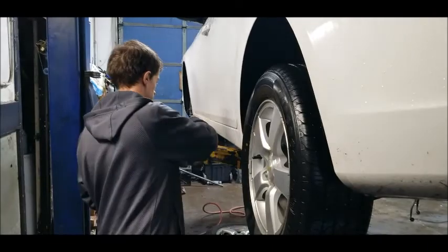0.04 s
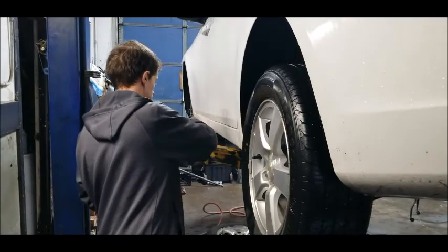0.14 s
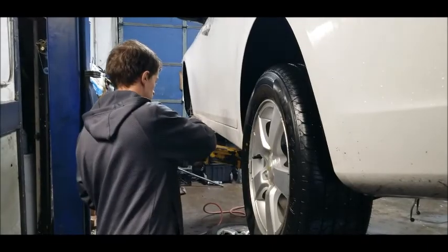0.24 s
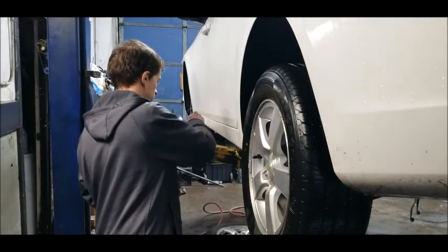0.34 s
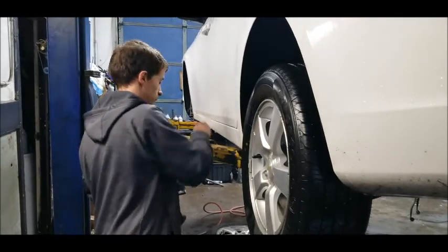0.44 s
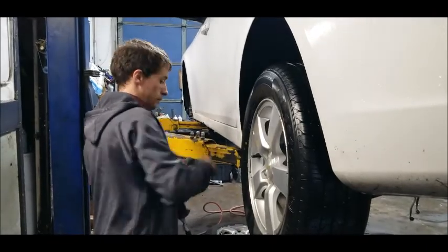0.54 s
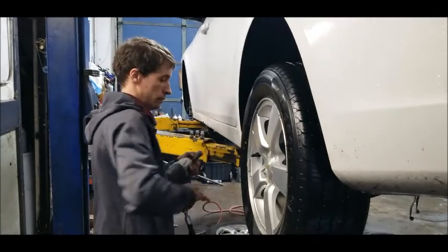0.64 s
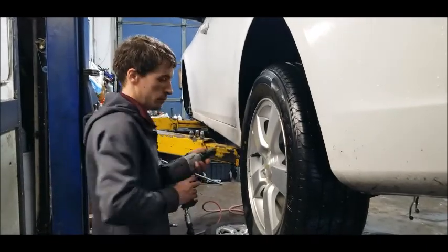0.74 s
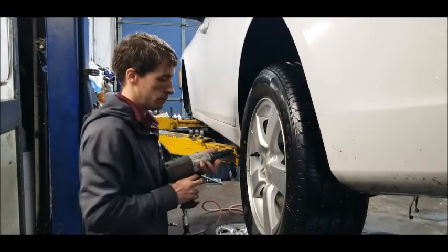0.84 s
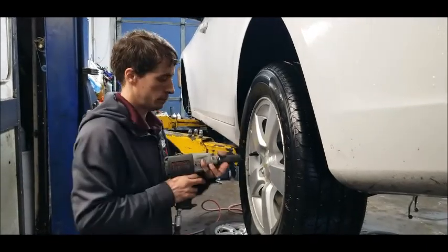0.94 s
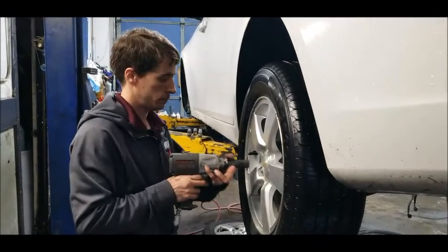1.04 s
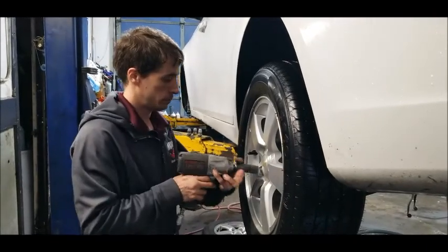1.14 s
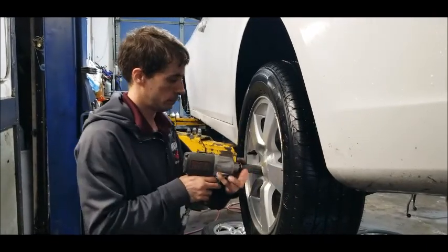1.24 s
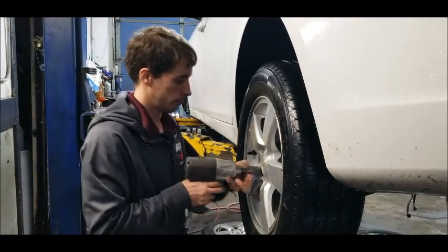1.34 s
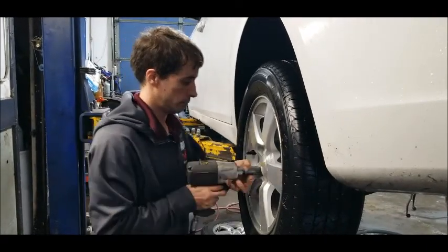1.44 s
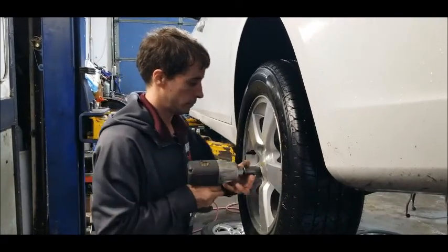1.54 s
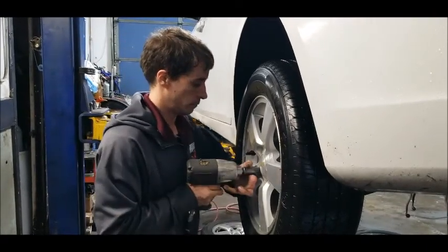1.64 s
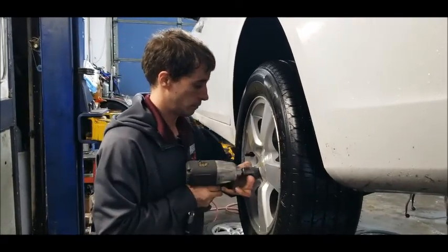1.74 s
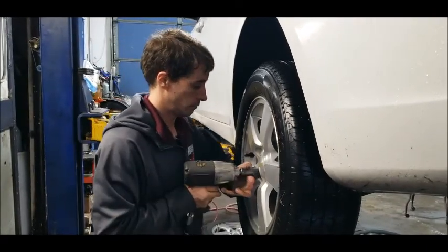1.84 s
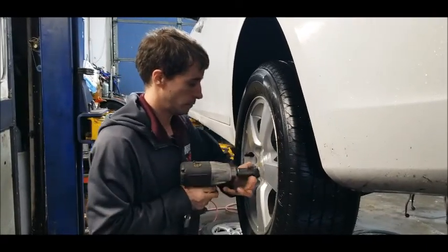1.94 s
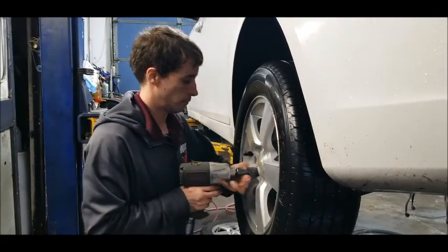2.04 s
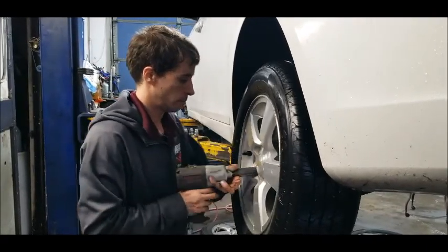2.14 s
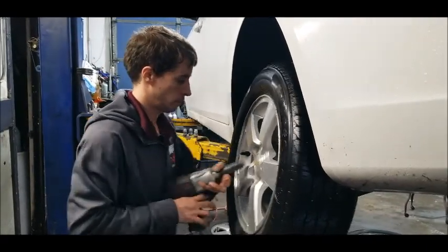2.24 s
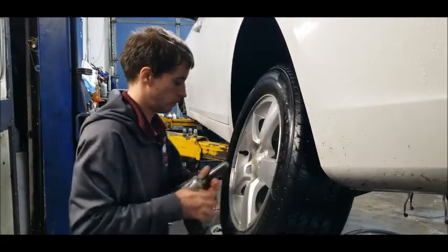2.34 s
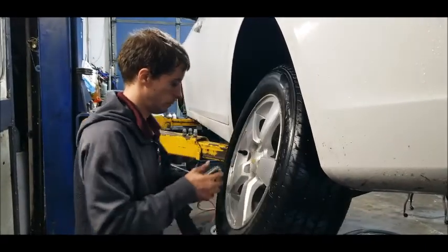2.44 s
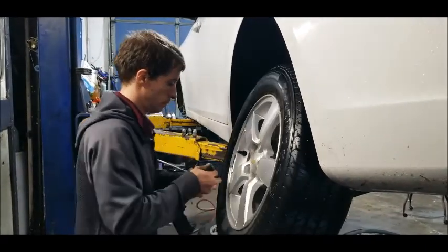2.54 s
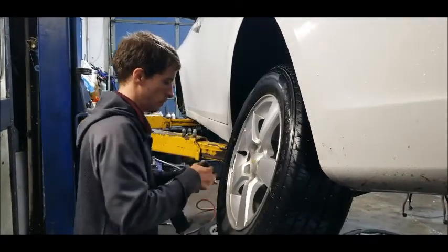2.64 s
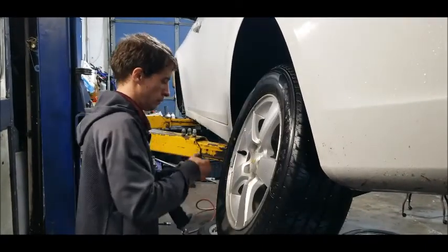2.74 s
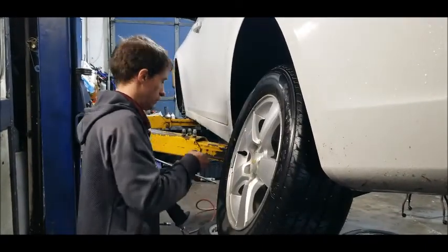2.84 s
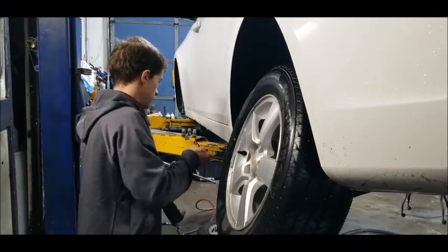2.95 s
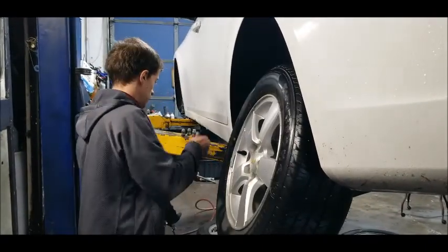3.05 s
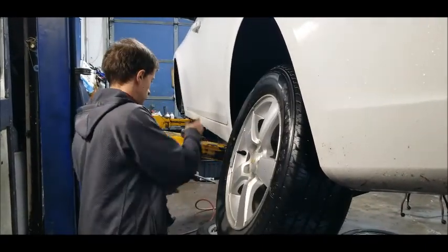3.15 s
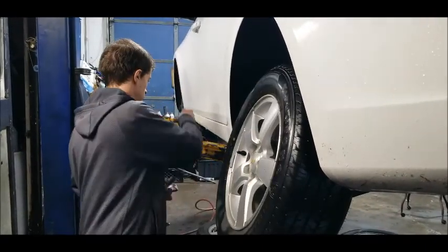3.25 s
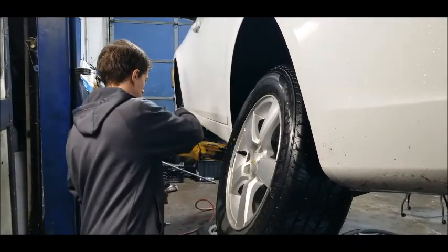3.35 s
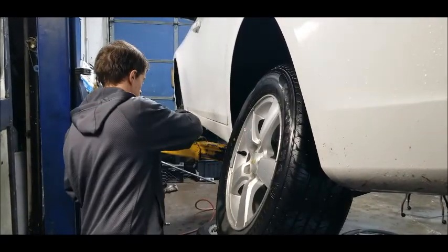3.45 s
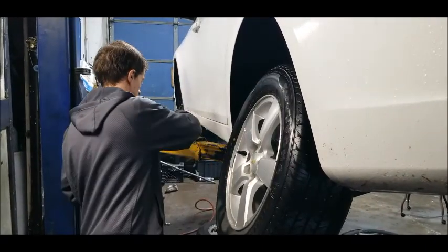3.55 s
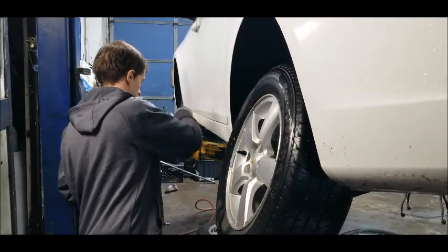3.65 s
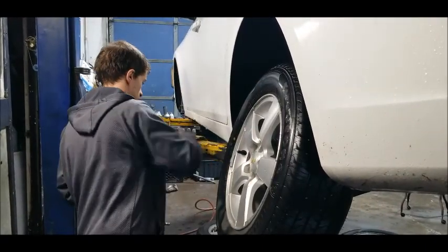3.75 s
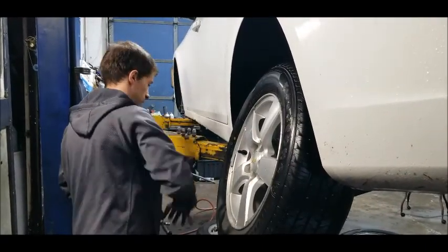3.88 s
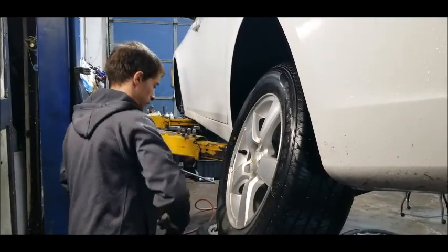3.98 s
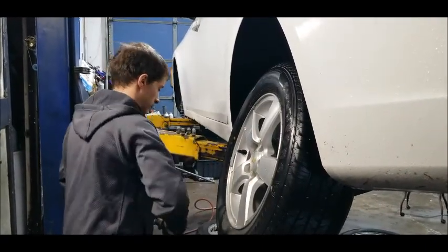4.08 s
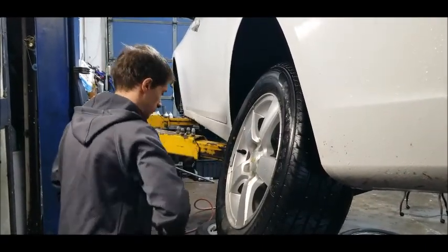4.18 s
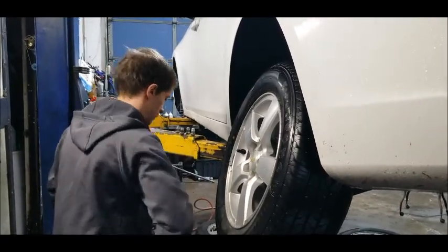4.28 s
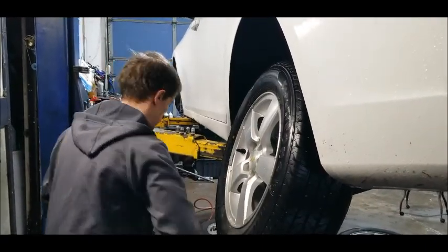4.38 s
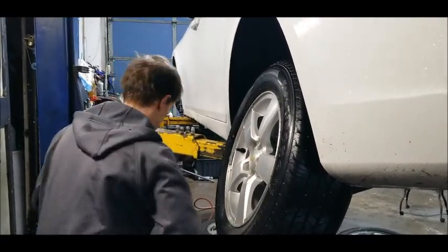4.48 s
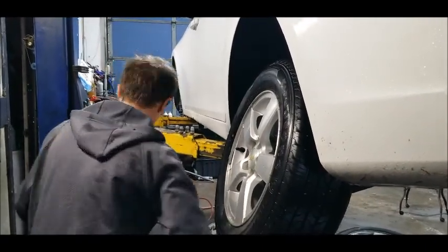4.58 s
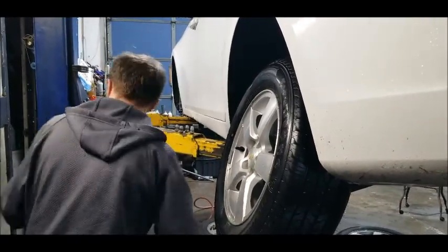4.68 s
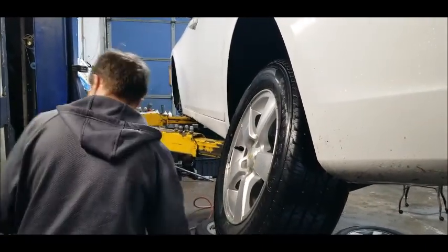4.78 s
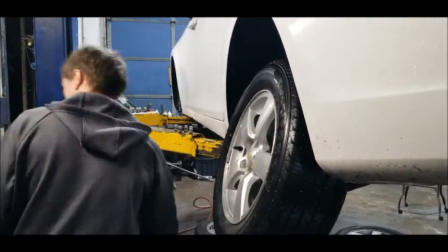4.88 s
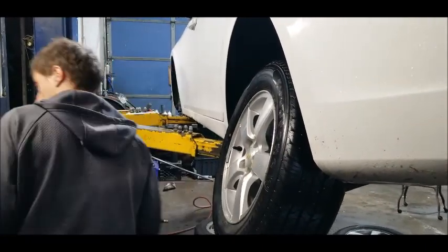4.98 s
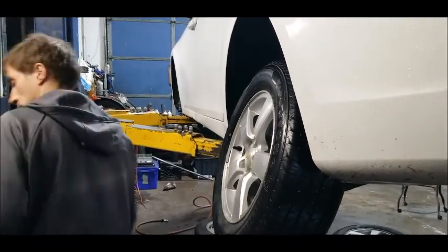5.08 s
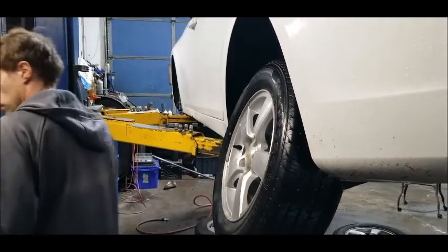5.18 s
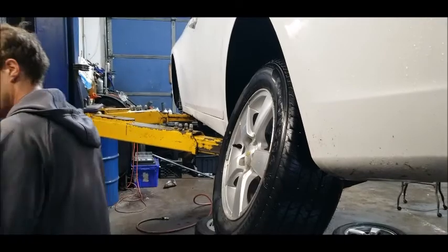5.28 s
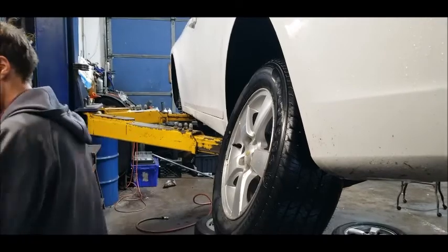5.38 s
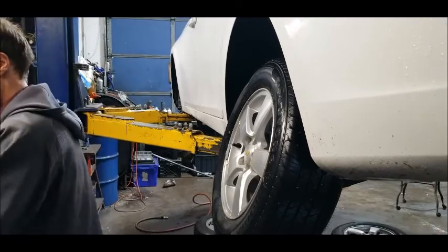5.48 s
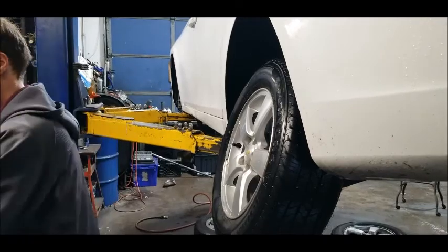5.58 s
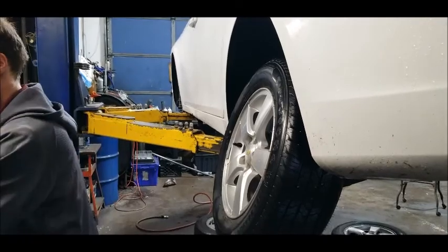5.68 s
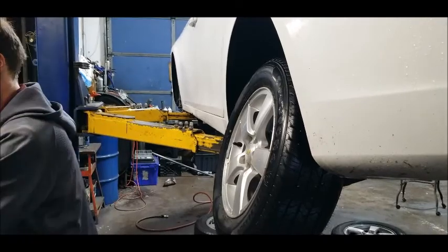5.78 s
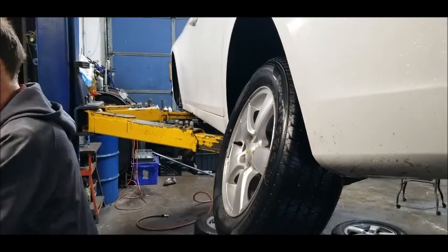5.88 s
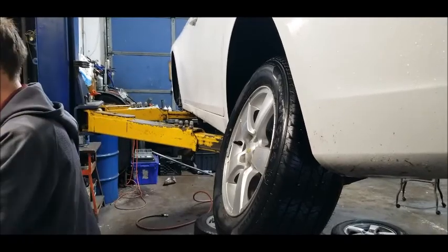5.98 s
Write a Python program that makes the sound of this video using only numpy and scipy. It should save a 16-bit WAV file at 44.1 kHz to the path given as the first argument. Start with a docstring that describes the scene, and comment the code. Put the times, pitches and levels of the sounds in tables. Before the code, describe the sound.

In a humming garage, an air wrench hammers a wheel nut in one short burst, whines down, then air vents and a hollow object lands.

```python
"""An air wrench in a garage workshop hammers on a wheel nut, spins free and winds down with a whine.
Hammer blows excite resonances; vanes chop the exhaust hiss, drive the whine and ring the exhaust port.
Around it, struck bodies (socket, nut, steel, tools) ring in decaying modes, clothes rustle as shaped noise,
the air coupling vents twice as rushing noise, and something heavy and hollow is put down.
A fan hums behind as narrow noise bands and motor tones, and a dying noise tail gives the hall."""
import sys
import numpy as np
from scipy import signal
from scipy.fft import rfft, irfft
from scipy.io import wavfile

SR = 44100
rng = np.random.default_rng(int(sys.argv[2]) if len(sys.argv) > 2 else 0)


def to_wav(sig):
    """Store sig (one row per channel, or 1-D mono) as 16-bit WAV at the path in sys.argv[1].

    Samples outside -1..1 are clipped; the rate is SR.
    """
    pcm = np.clip(np.atleast_2d(sig), -1, 1) * 32767
    pcm = np.round(pcm).astype(np.int16)
    wavfile.write(sys.argv[1], SR, pcm.T)  # frames by channels


N = 265469
TIME = np.arange(N) / SR

# Spectrum of escaping air, for blows and exhaust. Each row: frequency in Hz, relative level in dB.
HISS_SPECTRUM = [(180, -44.5), (300, -13), (539, -14), (660, -11), (1090, -5), (1250, -18.5), (1580, -7),
                 (3770, -7), (5830, -1.5), (8580, -21), (11800, -3.5), (15700, -10), (16500, -31)]
# Spectrum of bright rubbing, also of the faint hiss. Each row: frequency in Hz, relative level in dB.
BRIGHT_RUB_SPECTRUM = [(3000, -23.5), (4500, -5.5), (6160, 0.5), (8860, -19.5), (12700, -3), (15900, -20),
                       (16500, -43.5)]


def from_db(db):
    """Amplitude ratio of a level: 20 dB is a factor of ten."""
    return 10 ** (np.asarray(db) / 20)


def rms_one(x):
    """Normalization to unit root-mean-square amplitude."""
    return x / np.sqrt(np.mean(x ** 2) + 1e-20)


def in_time(rows):
    """Linear interpolation of a curve's columns at every sample."""
    s, *columns = np.transpose(rows)
    return [np.interp(TIME, s, column) for column in columns]


def placed(x, pan_db):
    """Stereo placement by level difference, left over right, shared between both channels."""
    gains = from_db(np.array([pan_db / 2, -pan_db / 2]))
    return x * gains.reshape(2, -1)


def noise(spectrum):
    """Filtered stereo noise of rms 1; the coherence of the channels depends on frequency."""
    # Likeness of left and right. Each row: frequency in Hz, correlation from 0 to 1.
    likeness = [(30, .9), (150, 0.88), (300, .85), (550, 0.27), (1200, 0.09), (3000, 0.08), (15000, .03)]
    log_hz = np.log(np.fft.rfftfreq(N, 1 / SR) + 1)

    def read(table):
        hz, value = np.transpose(table)
        return np.interp(log_hz, np.log(hz), value)

    alike = np.clip(read(likeness), 0, 1)
    mid, side = rfft(rng.standard_normal((2, N)))
    both = np.sqrt(1 + alike) * mid + np.sqrt(1 - alike) * side * [[1], [-1]]
    return rms_one(irfft(both * from_db(read(spectrum)), N))


def resonance(x, hz, width_hz):
    """Two-pole resonance with about unit gain at its peak; the pole radius sets the bandwidth."""
    r = np.exp(-np.pi * width_hz / SR)
    poles = [1, -2 * r * np.cos(2 * np.pi * hz / SR), r * r]
    return signal.lfilter([(1 - r * r) / 2, 0, (r * r - 1) / 2], poles, x)


def drift(rate_hz):
    """Random fluctuation of rms 1: noise low-passed at the given rate."""
    low_pass = signal.butter(2, rate_hz, fs=SR, output="sos")
    slow = signal.sosfilt(low_pass, rng.standard_normal(N + SR))
    return rms_one(slow[SR:])   # the filter has settled


def dying(start_s, t60_s, rise_s):
    """Exponential decay, falling 60 dB in t60_s, after an exponential rise."""
    t = np.maximum(TIME - start_s, 0)
    return (1 - np.exp(-t / rise_s)) * from_db(-60 * t / max(t60_s, .005))


def struck(hits, modes):
    """Modal synthesis: every impulse excites the same damped sinusoids."""
    clicks = np.full(N, 1e-18)
    for s, db in hits:
        clicks[round(s * SR)] = from_db(db)
    out = 0
    for hz, level_db, t60_s in modes:
        r = from_db(-60 / (t60_s * SR))
        w = 2 * np.pi * hz / SR
        poles = [1, -2 * r * np.cos(w), r * r]
        out = out + signal.lfilter([0, from_db(level_db) * np.sin(w)], poles, clicks)
    return out


def cracks(hits):
    """Impulse response of broad resonances, with random strengths: cracks of about a millisecond."""
    # Crack resonances. Each row: frequency in Hz, bandwidth in Hz, relative level in dB.
    crack_modes = [(2200, 1500, -9), (4200, 640, -1.5), (6400, 330, 6), (11420, 600, -3.5),
                   (15100, 5700, -9.5)]
    at = np.round(hits[:, 0] * SR).astype(int)
    spread_db = 2.2 * rng.standard_normal((len(hits), len(crack_modes)))
    out = 0
    for k, (hz, width_hz, db) in enumerate(crack_modes):
        clicks = np.full(N, 1e-18)
        clicks[at] = from_db(hits[:, 1] + db + 9.5 + spread_db[:, k])
        out = out + (-1) ** k * resonance(clicks, hz, width_hz)   # alternate polarity
    return out


def workshop_air():
    """Superposition of slowly wavering motor tones, narrow-band fan noise and broad noise of the hall."""
    # Wavering fan hum. Each row: frequency in Hz, bandwidth in Hz, relative level in dB.
    fan_bands = [(78, 52, -68), (213.1, 10, -60.5), (238.36, 8.8, -53), (299.4, 5.4, -53)]
    # Background level over time. Each row: time in seconds, gain of the fan bands in dB, broad noise in dB.
    background_level = [(0, -2.5, -51), (.5, 1.5, -48.5), (1.6, 0, -47.5), (2.2, 0.5, -51.5),
                        (2.8, -6, -53), (3.5, 1, -49.5), (4, 0.5, -49), (4.5, 6, -44.5), (5.3, 3, -43.5),
                        (6.02, 3.5, -46.5)]
    # Motor hum. Each row: frequency in Hz, relative level in dB.
    motor_tones = [(75.4, -59), (120, -66.5), (152, -54), (259, -53)]
    # Broad noise spectrum. Each row: frequency in Hz, relative level in dB.
    air_spectrum = [(15, -42), (25, -13.5), (108, -7.5), (146, -16), (192, -11.5), (252, 1), (358, -15.5),
                    (524, -13), (1250, -22.5), (2330, -23.5), (6040, -39), (8370, -57), (12900, -52),
                    (15200, -53.5), (16500, -68)]
    bands_db, broad_db = in_time(background_level)
    bands = 0
    for hz, width_hz, db in fan_bands:
        white = rng.standard_normal(N + SR)
        band = resonance(resonance(white, hz, width_hz), hz, width_hz)
        bands = bands + from_db(db) * rms_one(band[SR:])
    motor = 0
    for hz, db in motor_tones:
        level = from_db(db + 1.0 + 1.7 * drift(0.5))
        cycles = hz * TIME + rng.random() + 0.1 * drift(2.1)
        motor = motor + level * np.sin(2 * np.pi * cycles)
    hum = from_db(bands_db) * bands + motor
    return placed(hum, -3.0) + placed(from_db(broad_db) * noise(air_spectrum), -1.1)


def far_clack():
    """Two-stage decay: a clack across the shop, dulled by distance, starts quickly and trails off."""
    # Spectrum of the clack. Each row: frequency in Hz, relative level in dB.
    clack_spectrum = [(700, -25), (1500, -1), (2500, -1.5), (4300, -3.5), (6800, -7), (8200, -25)]
    start_s, level_db, t60_s = 0.1406, -48.5, 0.69
    tail = dying(start_s, 0.17 * t60_s, .002) + 0.77 * dying(start_s, t60_s, .004)
    return placed(from_db(level_db) * tail * noise(clack_spectrum), 0.5)


def hall(x):
    """Convolution reverberation: dense dying reflections, the treble dulled by the walls."""
    t60_s, wall_cut_hz = 0.38, 4200
    t = TIME[:SR]
    reflections = noise([(50, -15), (200, -3), (1500, 0), (wall_cut_hz, 0), (16000, -6)])[:, :SR]
    tail = reflections * from_db(-60 * t / t60_s) * (t > .006)
    return signal.fftconvolve(x, rms_one(tail) / np.sqrt(SR), axes=1)[:, :N]


def rustle():
    """Friction noise: sleeves, hose and tool rub under smooth humps, over a faint continuous hiss."""
    # Rubbing. Each row: start in seconds, length in seconds, dull part in dB, bright part in dB.
    scuffs = [(1.197, 0.036, -51, -57), (2.405, 0.043, -46.5, -39.5), (2.48, 0.13, -55, -51.5),
              (3.492, 0.13, -56, -75), (4.175, 0.15, -56.5, -58.5), (4.385, 0.088, -68, -58.5),
              (4.826, 0.063, -49, -52.5), (4.967, .088, -53, -49), (5.077, 0.11, -49, -62),
              (5.121, 0.23, -47, -39.5), (5.828, 0.12, -69, -54)]
    # Faint hiss, perhaps an air leak. Each row: time in seconds, level in dB.
    leak_level = [(0, -70.5), (1.5, -66), (2.3, -63), (2.7, -71), (4.1, -69), (4.8, -59.5), (5.5, -58.5),
                  (5.8, -66.5), (6.02, -54.5)]
    # Spectrum of dull rubbing. Each row: frequency in Hz, relative level in dB.
    dull_spectrum = [(800, -22.5), (1500, -1.5), (2200, 0.5), (3500, -2), (5000, -25)]
    dull = noise(dull_spectrum) * from_db(0.83 * drift(100))   # drift makes the grain
    bright = noise(BRIGHT_RUB_SPECTRUM) * from_db(2.0 * drift(170))
    rubs = 0
    for s, length_s, dull_db, bright_db in scuffs:
        hump = np.sin(np.pi * np.clip((TIME - s) / length_s, 0, 1) ** .7)
        rubs = rubs + (dull * from_db(dull_db) + bright * from_db(bright_db)) * hump
    leak = from_db(in_time(leak_level)[0]) * noise(BRIGHT_RUB_SPECTRUM)
    return placed(rubs, 3.5) + placed(leak, 2.5)


def set_down():
    """Cavity-like low modes: a hollow thing lands and rocks."""
    # Landings. Each row: time in seconds, strength in dB.
    landings = [(5.813, -23.5), (5.838, -23.5), (5.895, -36), (5.937, -35.5)]
    # Modes of the hollow thing. Each row: frequency in Hz, relative level in dB, 60 dB decay in seconds.
    hollow_modes = [(345, 0, 0.1), (719, -10.5, 0.18), (777, -10, 0.13)]
    return struck(landings, hollow_modes)


def coupling():
    """Turbulent jet: the seal snaps open and trapped air rushes out, whistling in the fitting."""
    # Ventings. Each row: start in seconds, rush in dB, rise in seconds, decay scale in seconds,
    # whistle share, seal's snap in seconds, snap strength in dB.
    vents = [(4.4765, -16, .0035, .29, .22, 4.480, -12), (5.129, -20.5, .0015, .38, 1.3, 5.1303, -2)]
    # Spectrum of the rush. Each row: frequency in Hz, relative level in dB.
    vent_spectrum = [(290, -15), (500, -20), (810, -14), (1170, -13.5), (1950, -11), (2040, -10.5),
                     (2610, -13), (3500, -12.5), (5930, -2.5), (9190, -11), (12700, 5), (15800, -4.5),
                     (16500, -29)]
    air = noise(vent_spectrum) * from_db(2.36 * drift(77))
    whistle = resonance(air, 12340, 310) + 0.71 * resonance(air, 6300, 380)
    # a tone flutters during the second rush
    flutter_s, flutter_db, flutter_hz = 5.17, -32.5, 2080
    flutter = rms_one(resonance(air, flutter_hz, 250)) * from_db(flutter_db + 4.0 * drift(60))
    out = flutter * dying(flutter_s, 0.13, 0.012)
    for s, db, rise_s, decay_s, share, _, _ in vents:
        # fast at first, then slower
        pressure = dying(s, 0.21 * decay_s, rise_s) + 0.56 * dying(s, 1.35 * decay_s, rise_s)
        out = out + from_db(db) * (air + share * whistle) * pressure
    snaps = cracks(np.array(vents)[:, -2:])
    return placed(snaps + out, 9.5)


def nut_on_steel():
    """Modal ringing of the steel lift arm as the nut is laid on it."""
    # Nut laid on the lift arm. Each row: time in seconds, relative strength in dB.
    nut_hits = [(3.5004, -38)]
    # Modes of the arm. Each row: frequency in Hz, relative level in dB, 60 dB decay in seconds.
    arm_modes = [(1704, -6.5, 0.18), (1870, -8, 0.18), (2098, 0.5, 0.2), (2370, -8, 0.13), (2580, -9, 0.19),
                 (3550, -10, .08), (1990, -13, .1), (4250, -12, 0.13), (4650, -13, .07), (5200, -14, .06),
                 (5600, -19, .1), (6120, -19, .06)]
    return from_db(-5) * struck(nut_hits, arm_modes)


def nut_rattle():
    """Repeated impacts excite the modes of the nut, loose in the socket."""
    # Rattles. Each row: time in seconds, strength in dB.
    rattles = [(2.415, -50), (2.503, -48.5), (2.53, -51), (2.55, -63), (2.59, -57)]
    # Modes of the nut. Each row: frequency in Hz, relative level in dB, 60 dB decay in seconds.
    nut_modes = [(966, -4, .15), (1150, -8, .12), (2270, -3, .09), (3800, -4, .11), (4300, -2, .06)]
    return struck(rattles, nut_modes)


def socket():
    """Beating of two close high modes, until a hand damps the steel."""
    # Socket struck. Each row: time in seconds, strength in dB, seconds until damped.
    socket_hits = [(1.1995, -33, 0.05), (1.246, -59, .08), (2.951, -50.5, 0.256)]
    # Modes of the socket. Each row: frequency in Hz, relative level in dB, free 60 dB decay in seconds.
    socket_modes = [(15340, -7, 1.5), (15375, -10.5, 1.2)]
    out = 0
    for s, db, free_s in socket_hits:
        grip = from_db(-1200 * np.maximum(TIME - s - free_s, 0))
        out = out + struck([(s, db)], socket_modes) * grip
    return out


def handling():
    """Impact noise: thud, knock, tick and a body resonance; the low parts decay more slowly."""
    # Knocks. Each row: start in seconds, knock in dB, thud in dB, tick in dB, body resonance in Hz,
    # body in dB, 60 dB decay of knock and tick in seconds, left-right difference of knock and tick in dB.
    knocks = [(1.199, -31, -48, -38.5, 573, -41.5, 0.11, 2.5), (1.227, -37, -35, -51, 1125, -44, .095, -1),
              (1.2445, -29.5, -43, -34, 580, -35, 0.072, 3), (1.338, -35.5, -41, -51, 575, -37.5, .057, -5),
              (1.3572, -29.5, -38, -32.5, 610, -42, 0.054, 2.5),
              (1.4082, -28.5, -20.5, -27, 513, -31, .065, 2), (1.5207, -41.5, -47, -33, 1090, -44, 0.17, 5),
              (1.5397, -33, -34, -13.5, 690, -31.5, .1, 5), (2.259, -48.5, -35, -69, 960, -40.5, 0.088, -1),
              (2.2994, -54, -38.5, -64, 695, -60, 0.079, 6), (2.406, -44, -43, -44, 680, -63, .052, -2),
              (2.415, -41, -44, -32, 1170, -67, 0.052, 7), (2.9508, -64, -65.5, -55, 565, -67, 0.098, 7.5),
              (3.3987, -52, -54.5, -66, 1460, -53, 0.049, 0), (3.4997, -41.5, -59, -62, 875, -60, .071, -1),
              (4.166, -39.5, -49, -51, 885, -59, 0.066, 0), (4.3924, -56, -60, -50.5, 540, -47, .11, 7),
              (4.4771, -32.5, -23.5, -37, 1050, -36.5, 0.095, -13),
              (5.4176, -48, -50, -46, 615, -51, 0.12, -2), (5.5894, -50, -56, -48, 630, -66, 0.036, 8),
              (5.809, -35, -27.5, -38, 510, -33, 0.066, -1),
              (5.8164, -25.5, -20.5, -26, 510, -25.5, 0.05, 4.5),
              (5.8384, -42, -20.5, -54, 746, -25, .04, -1),
              (5.893, -28.5, -19.5, -41, 746, -23.5, 0.047, 0),
              (5.932, -46, -27.5, -57, 725, -42, 0.098, 7)]
    # Spectra of the three parts. Each row: frequency in Hz, relative level in dB.
    thud_spectrum = [(18, -29.5), (30, 2), (118, 1), (203, 2.5), (304, 1), (647, -8), (721, -3.5),
                     (909, -17), (1200, -11.5), (1560, -43.5), (2640, -120)]
    knock_spectrum = [(500, -19.5), (900, 1.5), (2000, 6.5), (3500, -1.5), (5500, -25.5)]
    tick_spectrum = [(2060, -24.5), (3500, -3), (5070, -3.5), (6000, -1.5), (9140, -24), (9630, -14.5),
                     (13300, -6.5), (15900, -14), (16500, -33)]
    body_width_hz, deep_lasts = 130, 1.75   # thud and body last this many times longer
    thud, knock, tick = noise(thud_spectrum), noise(knock_spectrum), noise(tick_spectrum)
    white = rng.standard_normal(N)
    out = 0
    for s, knock_db, thud_db, tick_db, body_hz, body_db, t60_s, pan_db in knocks:
        body = rms_one(resonance(resonance(white, body_hz, body_width_hz), body_hz, body_width_hz))
        sharp = from_db(knock_db) * knock + from_db(tick_db) * tick
        deep = from_db(body_db) * body + from_db(thud_db) * thud
        out = out + placed(sharp * dying(s, t60_s, 0.0015), pan_db)
        out = out + placed(deep * dying(s, deep_lasts * t60_s, 0.004), -1.3)
    return out


def air_motor():
    """Periodic modulation of flow: vanes chop the hiss, whine and excite the port; the housing shakes."""
    # Multiples 1 to 3 of the vane rate. Each row: level in dB at free speed, level in dB as the trigger
    # shuts, rise in seconds, 60 dB decay in seconds.
    whine_partials = [(-37, -23, 0.029, 0.5), (-31, -11, 0.015, 0.15), (-38.5, -22.5, 0.013, 0.31)]
    # Spectrum of the housing. Each row: frequency in Hz, relative level in dB.
    housing_spectrum = [(40, -24), (90, -0.5), (140, -1.5), (230, -3), (400, -3), (700, -11), (1200, -24)]
    # trigger opens, nut gives, trigger shuts, rotor stalls
    open_s, free_s, shut_s, stop_s = 1.53, 1.78, 1.972, 2.1
    valve_rise_s, spin_up_s, coast_s = .012, .17, .125   # coasting: time to lose 63% of the speed
    loaded_hz, free_hz = 300, 591   # vanes passing the port
    creep_s, creep_share = .04, .12   # the valve seeps before it opens: lead, share of the full flow
    bark_s = shut_s + .004   # the whine swells just after the trigger shuts

    spun = np.sin(np.pi / 2 * np.clip((TIME - free_s) / spin_up_s, 0, 1)) ** 2
    coasting = np.maximum(TIME - shut_s, 0)
    vane_hz = (loaded_hz + (free_hz - loaded_hz) * spun) * np.exp(-coasting / coast_s)
    phase = 2 * np.pi * np.cumsum(vane_hz * (1 + 0.02 * drift(60))) / SR
    opened = 1 - np.exp(-(np.maximum(TIME - open_s, 0) / valve_rise_s) ** 2)
    driven = opened * np.exp(-coasting / 0.022)
    turning = from_db(-450 * np.maximum(TIME - stop_s, 0))

    whine = 0
    for k, (free_db, shut_db, rise_s, t60_s) in enumerate(whine_partials):
        level = from_db(free_db) * driven * np.sqrt(spun)
        level = level + from_db(shut_db) * dying(bark_s, t60_s, rise_s)
        whine = whine + level * from_db(4.1 * drift(50)) * np.sin((k + 1) * phase)
    whine = turning * whine

    seep = creep_share * np.clip(1 + (TIME - open_s) / creep_s, 0, 1) ** 2
    hiss_level = from_db(-29.5 + 2 * spun - 60 * coasting / 0.4)   # louder at free speed
    chopped = 1 + 0.21 * np.sin(2 * phase)
    hiss = (opened + seep) * hiss_level * chopped * noise(HISS_SPECTRUM)

    rumble_level = turning * opened * dying(open_s, 1.52, .003) * from_db(-29 + 4.8 * drift(40))
    rumble = rumble_level * noise(housing_spectrum)

    puffs = np.exp(2.0 * (np.cos(phase) - 1))   # one puff for each vane
    puffs = (puffs + 0.33) * noise([(300, 0.0), (5000, 0.0027)]) + 0.45 * puffs
    port = resonance(puffs, 1523, 230) + 0.25 * resonance(puffs, 2000, 470)   # the exhaust port rings
    buzz_level = from_db(-15.5) * driven + from_db(-2) * dying(bark_s, 0.55, 0.022)
    buzz = turning * buzz_level * from_db(4.1 * drift(30)) * port
    return placed(hiss, 4.0) + placed(rumble + whine, -1.2) + buzz


def wheel(shake):
    """Resonant filtering: noise under an envelope, coloured by the rim."""
    # Rim resonances. Each row: frequency in Hz, bandwidth in Hz, relative level in dB.
    rim_modes = [(1560, 250, -9.5), (1790, 150, 4.5), (2290, 94, 3), (2458, 300, -4), (2880, 510, -7)]
    white = noise([(100, 0.016), (9000, 0.0048)]) * shake
    ring = sum(from_db(db + 14) * resonance(white, hz, width_hz) for hz, width_hz, db in rim_modes)
    return placed(ring, 1.7)


def hammer():
    """Impact excitation: a crack, a gritty rattle and stray clatter of the clutch, then a wheel ring."""
    # Hammer on anvil. Each row: time in seconds, relative crack level in dB, relative wheel ring in dB.
    anvil_blows = [(1.5511, 2, -11), (1.589, 1, -8), (1.631, 0.5, -20), (1.670, 3, -12), (1.710, 6.5, -14),
                   (1.748, 2, -14.5), (1.788, 3.5, -14), (1.814, -2, -18.5), (1.854, -9, -15.5),
                   (1.897, -2.5, -19), (1.938, -2.5, -20)]
    rattle_db, tight_blows = -16.5, 3   # the hammer rebounds while the nut is tight
    rebound_s, rebound_loss_db, rattle_loss_db = .0195, 11.5, 4
    first_s, last_s = anvil_blows[0][0], anvil_blows[-1][0]
    blows = np.array([(s, db, ring_db, rattle_db) for s, db, ring_db in anvil_blows])
    rebound = [rebound_s, -rebound_loss_db, -rebound_loss_db, -rattle_loss_db]
    blows = np.vstack([blows, blows[:tight_blows] + rebound])
    rattle, shake = 0, 0
    for s, _, ring_db, grit_db in blows:
        burst = dying(s + 0.0045, 0.076, 0.002) + .6 * dying(s, 0.0081, 0.00023)
        rattle = rattle + from_db(grit_db) * burst
        shake = shake + from_db(ring_db) * dying(s + 0.0035, 0.051, .004)
    grit = from_db(4.1 * drift(250))
    # 30 stray clicks at random times, -25 to -13 dB
    clatter = rng.random((30, 2)) * [last_s - first_s, -12] + [first_s, -13]
    hits = np.vstack([blows[:, :2], clatter])
    return placed(cracks(hits) + rattle * grit * noise(HISS_SPECTRUM), 7.1) + wheel(shake)


def scene():
    """Superposition of all sources, with the hall's reverberation on those nearby."""
    rings = socket() + nut_on_steel() + nut_rattle()
    near = hammer() + air_motor() + handling() + coupling() + placed(rings, 3.0) + rustle()
    near += placed(set_down(), -1.7)
    return near + from_db(-8.5) * hall(near) + workshop_air() + far_clack()


def record(dry):
    """Band limiting and soft saturation: deepest bass dropped, peaks rounded, top cut."""
    mic = signal.sosfilt(signal.butter(2, 35, "high", fs=SR, output="sos"), dry)
    rounded = .88 * np.tanh(mic / .88)
    return signal.sosfilt(signal.cheby2(16, 80, 16600, fs=SR, output="sos"), rounded)


dry = scene()
out = record(dry)
to_wav(out)
```